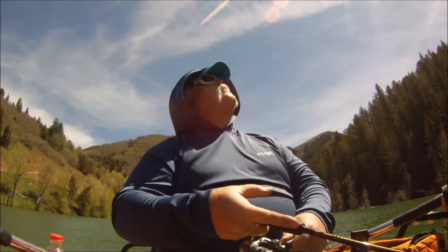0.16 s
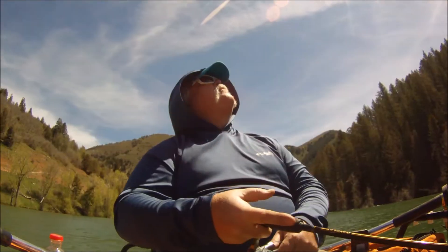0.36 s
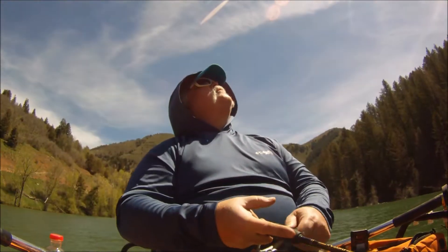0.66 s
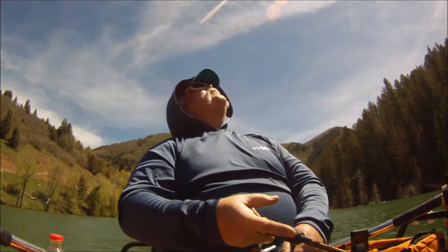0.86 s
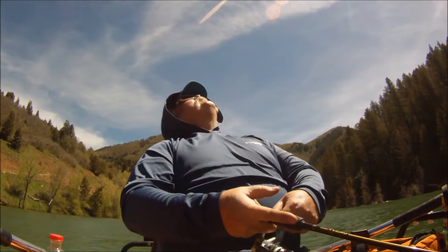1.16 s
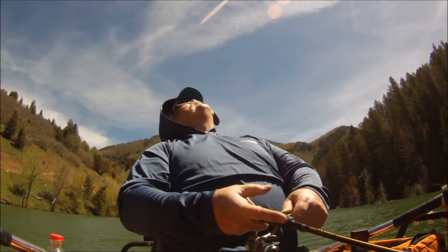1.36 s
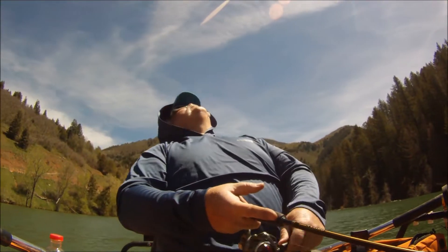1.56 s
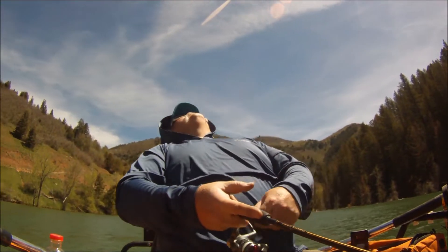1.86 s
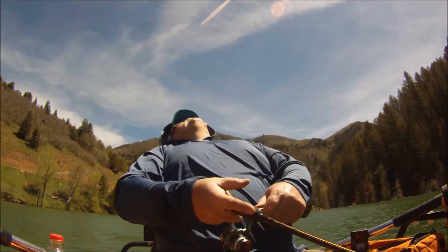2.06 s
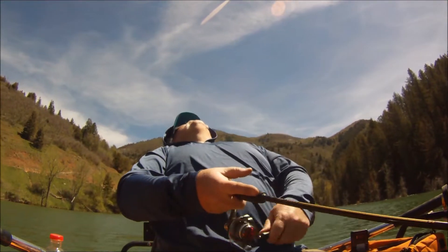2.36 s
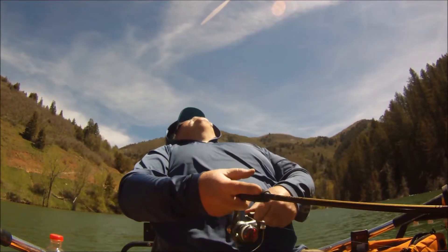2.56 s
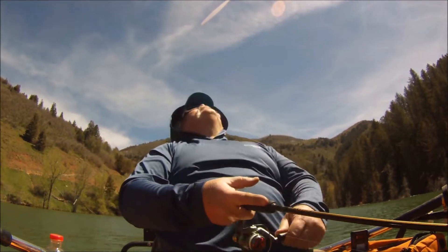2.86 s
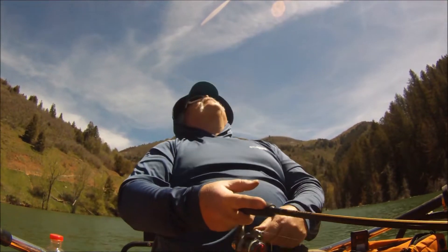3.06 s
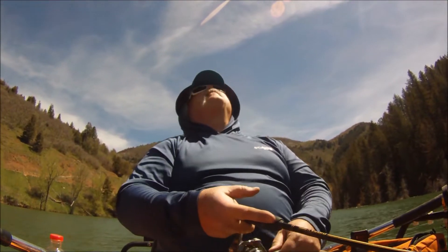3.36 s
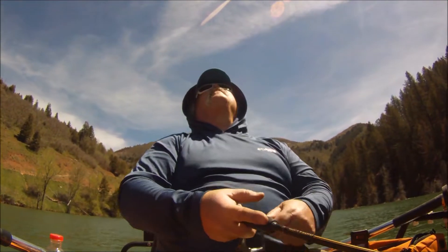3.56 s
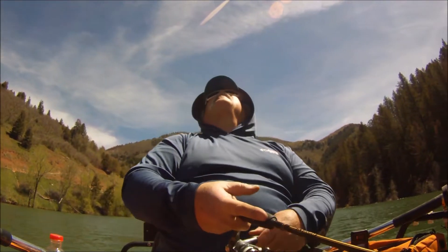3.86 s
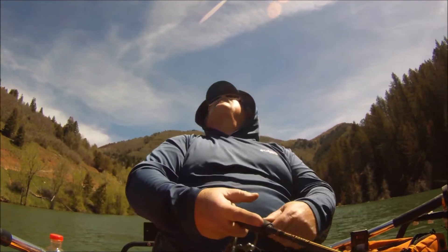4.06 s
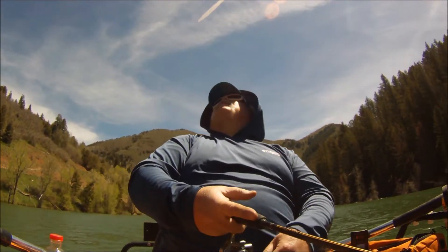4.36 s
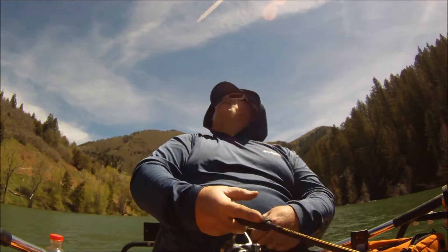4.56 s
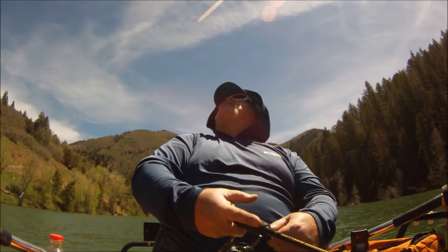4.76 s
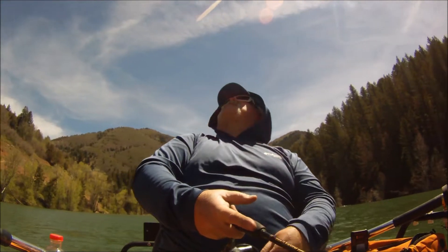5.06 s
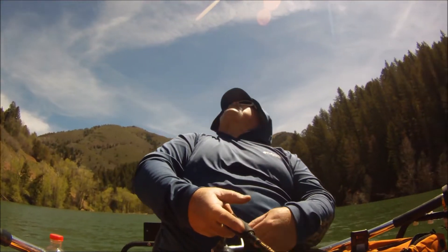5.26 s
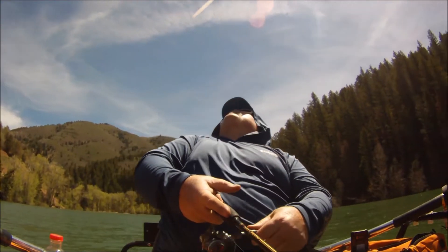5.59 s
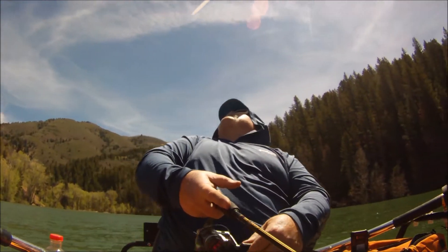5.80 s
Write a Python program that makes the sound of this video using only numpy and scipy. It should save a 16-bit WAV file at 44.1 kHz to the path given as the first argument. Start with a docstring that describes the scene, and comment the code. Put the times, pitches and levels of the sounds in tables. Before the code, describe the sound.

Outdoors on a lake, a distant jet's dull, wavering roar rises over the first second and stays, slightly hollow from its reflection off the water. Close to a small camera on a fishing boat, water drips and snaps, with busy bubbling splashes just after one second and again past four. A tiny metal tinkle and faint thin whistles come near the start. One channel, highs cut.

```python
"""A jet passes high over a mountain lake, heard by a small camera on a fishing boat.
Its roar is noise dulled by far air and shaken by turbulence; a late copy off the water combs it.
Water hisses, snaps and drips at the hull: noise bursts for splashes, short sines for bubbles.
Decaying sines make a bit of metal tackle tinkle, gliding sines whistle thinly, and soft airy noise swells twice."""
import sys
import numpy as np
from scipy import signal
from scipy.fft import rfft, irfft, next_fast_len
from scipy.io import wavfile
from scipy.ndimage import uniform_filter1d, map_coordinates

SR = 44100
rng = np.random.default_rng(int(sys.argv[2]) if len(sys.argv) > 2 else 0)


def wav_record(signal):
    """Record a signal, one row per channel, as 16-bit PCM in the file named by sys.argv[1]."""
    frames = np.transpose(np.atleast_2d(signal))
    bounded = np.clip(frames, -1, 1)
    # unit amplitude maps onto the largest positive 16-bit level
    quanta = np.round(bounded * 32767).astype(np.int16)
    wavfile.write(sys.argv[1], SR, quanta)


N = 261492
T = np.arange(N) / SR  # the time of every sample, in seconds


def undb(db):
    """Turns dB into a plain factor."""
    return 10 ** (np.asarray(db) / 20)


def unit(x):
    """Scales x to an rms of 1."""
    return x / np.sqrt(np.mean(x ** 2))


def curves(table):
    """Joins the points of each column by straight lines in time."""
    s, *columns = np.transpose(table)
    return [np.interp(T, s, c) for c in columns]


def noise():
    """White noise with a spread of 1."""
    return rng.standard_normal(N)


def walk(rate):
    """A random wavering with a spread of 1: levels held 1 / rate seconds, then smoothed twice."""
    hold = int(SR / rate)
    levels = np.repeat(rng.standard_normal(N // hold + 1), hold)
    smooth = uniform_filter1d(uniform_filter1d(levels, hold), hold)[:N]
    smooth = smooth - uniform_filter1d(smooth, 5 * hold)  # no long drift
    return smooth / smooth.std()


def spectrum_gain(spectrum):
    """Joins (Hz, dB) points over log frequency; gives FFT size, log frequencies and gains."""
    hz, db = np.transpose(spectrum)
    size = next_fast_len(N)
    logf = np.log(np.maximum(np.arange(size // 2 + 1), 1) * SR / size)
    return size, logf, undb(np.interp(logf, np.log(hz), db, left=-120, right=-120))


def coloured(x, spectrum):
    """Colours x by (Hz, dB) points, scaled so that unit noise stays near unit level."""
    size, _, gain = spectrum_gain(spectrum)
    return irfft(rfft(x, size) * unit(gain), size)[:N]


def bands(x, spectrum, count):
    """Colours x and splits it into overlapping log-spaced bands: (centre in Hz, signal) pairs."""
    size, logf, gain = spectrum_gain(spectrum)
    full = rfft(x, size) * gain
    centres = np.linspace(np.log(spectrum[0][0]), np.log(spectrum[-1][0]), count)
    step = centres[1] - centres[0]
    pairs = []
    for centre in centres:
        window = np.cos(np.clip((logf - centre) / step, -1, 1) * np.pi / 2) ** 2
        pairs.append((np.exp(centre), irfft(full * window, size)[:N]))
    return pairs


def wavering_noise(spectrum, count, waver_db, rate):
    """Coloured noise whose bands waver in level independently; rms 1."""
    return unit(sum(x * undb(waver_db * walk(rate)) for _, x in bands(noise(), spectrum, count)))


def ring(s, db, hz, t60, glide, rise_s):
    """One softly starting, decaying sine per start time; t60 is the time to fall 60 dB, glide in Hz per s."""
    out = np.zeros(N)
    for start, gain, f, decay, up in zip(*np.broadcast_arrays(s, undb(db), hz, t60, glide)):
        i = int(start * SR)
        t = np.arange(min(int(decay * SR) + 1, N - i)) / SR
        shape = np.exp(-np.log(1000) * t / decay) * (1 - np.exp(-t / rise_s))
        out[i:i + len(t)] += gain * np.sin(2 * np.pi * (f + up * t / 2) * t) * shape
    return out


def tails(s, db, tau_s):
    """An envelope that jumps at each time and dies away."""
    hits = np.zeros(N)
    hits[(s * SR).astype(int)] = undb(db)
    return signal.lfilter([1], [1, -np.exp(-1 / (tau_s * SR))], hits)


# Colour of the airy hiss. Each row: frequency in Hz, relative level in dB per Hz.
AIRY_COLOUR = [(3000, -20.5), (4200, -1.5), (5300, -0.5), (6200, -7), (7400, -6), (9500, -15.5),
               (13000, -23)]
# Its two swells. Each row: time in seconds, level in dB.
AIRY_LEVEL = [(2.42, -93.5), (2.55, -74), (2.72, -70), (2.97, -74), (3.04, -93.5), (5.18, -96), (5.23, -68),
              (5.3, -72), (5.38, -94)]


def airy():
    """A soft noise that swells and stops, as of wet line drawn through the rod."""
    return undb(curves(AIRY_LEVEL)[0]) * wavering_noise(AIRY_COLOUR, count=6, waver_db=1.5, rate=12)


# Faint gliding whistles. Each row: start in seconds, length in seconds, level in dB before wavering,
# start pitch in Hz, end pitch in Hz.
WHISTLE_GLIDES = [(0.369, .07, -72, 3250, 3500), (.373, .045, -59, 2210, 2250),
                  (.44, .082, -64, 1760, 2000), (0.444, 0.15, -68, 3000, 3620), (.63, .08, -81, 3100, 3670)]
WHISTLE_EDGE_S, WHISTLE_BEND = .01, 1.3  # fade in and out; a bend above 1 makes the start of the glide faster


def whistles():
    """Thin sines whose pitch rises fastest at first, then levels off; their loudness wavers quickly."""
    out = 0
    for s, length, db, start_hz, end_hz in WHISTLE_GLIDES:
        part = np.clip((T - s) / length, 0, 1)
        hz = end_hz - (end_hz - start_hz) * (1 - part) ** WHISTLE_BEND
        shape = np.clip(np.minimum(T - s, s + length - T) / WHISTLE_EDGE_S, 0, 1)
        out = out + undb(db) * shape * np.sin(2 * np.pi * np.cumsum(hz) / SR)
    return out * undb(2.7 * walk(59.3))


# Touches of the bouncing metal. Each row: start in seconds, strength in dB.
TACKLE_TOUCHES = [(0.2222, -42), (0.2351, -39), (0.2443, -36), (0.2569, -31)]
# Ringing tones of the metal. Each row: pitch in Hz, relative level in dB, time to fall 60 dB in seconds.
TACKLE_MODES = [(6692, -6.5, 0.13), (9652, -7.5, 0.27), (15260, -36, .1)]


def tackle():
    """A small metal piece bounces: a noise tick at each touch, its ringing modes from the second on."""
    s, db = np.transpose(TACKLE_TOUCHES)
    modes = sum(ring(s[1:], db[1:] + mode_db, hz, t60, 0, rise_s=0.00025) for hz, mode_db, t60 in TACKLE_MODES)
    tick_colour = [(2500, -20.5), (4000, -3.0), (6000, 0.5), (9000, -2.5), (15500, -12.0)]  # (Hz, dB)
    return modes + coloured(tails(s, db, 0.001) * noise(), tick_colour)


# Colour of the smooth water hiss. Each row: frequency in Hz, relative level in dB per Hz.
HISS_COLOUR = [(1650, -32.5), (2800, -4.5), (3640, -20), (5310, -8.5), (6430, -13), (8010, -10),
               (14500, -14), (15300, -20.5)]
# Loudness of that hiss. Each row: time in seconds, level in dB.
HISS_LEVEL = [(0, -76), (.12, -66), (.25, -64.5), (.6, -67), (1.3, -72.5), (2.4, -75.5), (2.98, -75.5),
              (3.05, -79.5), (3.5, -79.5), (3.75, -76.5), (4.2, -73.5), (4.95, -73.5), (5.06, -81),
              (5.18, -74.5), (5.3, -74), (5.93, -73)]
# Colour of fizz, snaps and splashes. Each row: frequency in Hz, relative level in dB per Hz.
CRACKLE_COLOUR = [(1100, -32.5), (1500, 1.5), (2200, -2.5), (2890, -6), (3480, -4.5), (4840, -7.5),
                  (5890, -9), (8250, -17.5), (12000, -37.5), (15600, -59)]
# Loudness of the fizzing grains. Each row: time in seconds, level in dB before the grains are mixed.
FIZZ_LEVEL = [(0, -57.5), (.57, -65.5), (.88, -62.5), (1.0, -66), (1.24, -63.5), (1.3, -50.5), (1.39, -69),
              (1.45, -70.5), (2.0, -74), (2.3, -72), (2.42, -73), (3.0, -73), (3.11, -79), (3.6, -74.5),
              (3.78, -66.5), (4.0, -68.5), (4.26, -67), (4.34, -53.5), (4.39, -58), (4.43, -59.5),
              (4.46, -59), (4.5, -54), (4.55, -60), (4.65, -67), (5.0, -69.5), (5.2, -72), (5.27, -67.5),
              (5.6, -72), (5.9, -63)]
# Thin broad snaps at the hull. Each row: start in seconds, strength in dB before smoothing.
HULL_SNAPS = [(.008, -42.5), (.148, -59), (.171, -45), (.343, -61.5), (0.36, -53), (.53, -54.5),
              (0.542, -52), (0.5602, -51.5), (.712, -51), (0.7772, -51), (0.834, -56), (0.86, -43),
              (.942, -59), (.993, -54.5), (1.036, -52), (1.049, -50.5), (1.191, -43.5), (1.266, -42.5),
              (1.333, -40), (1.362, -42), (1.214, -48), (1.4273, -52), (2.299, -54.5), (2.362, -64),
              (3.7, -56.5), (3.766, -51.5), (3.884, -59.5), (3.925, -50.5), (3.967, -48.5), (4.0348, -63),
              (4.0748, -52.5), (4.107, -43.5), (4.114, -43.5), (4.233, -49.5), (4.341, -44), (4.422, -49),
              (4.472, -42.5), (4.587, -54), (4.6768, -64), (5.001, -64), (5.228, -61), (5.398, -59),
              (5.424, -57), (5.635, -49.5), (5.7509, -56), (5.763, -54.5), (5.8544, -56), (5.8827, -42),
              (5.903, -51.5)]
SNAP_S = 0.0013  # decay time of a snap


def snap_noise(s, db):
    """Short bursts of crackling noise with slightly rounded edges."""
    return coloured(uniform_filter1d(tails(s, db, SNAP_S), size=50) * noise(), CRACKLE_COLOUR)


def water():
    """Smooth hiss, and a fizz of tiny bubbles of scattered size and pitch with thin snaps among them."""
    hiss = wavering_noise(HISS_COLOUR, count=6, waver_db=1.2, rate=5.0)
    fizz = wavering_noise(CRACKLE_COLOUR, count=9, waver_db=2.6, rate=40)
    when, pitch, size = rng.random((1400, 3)).T
    hz = 2100 * 3.6 ** pitch
    size_db = np.minimum(-4.1 * np.log(size), 13)  # many weak bubbles, few strong ones
    pop_db = size_db - 2.2 * np.log2(hz / 3000)  # higher ones are weaker
    pops = ring(when * N / SR, pop_db, hz, 25 / hz, 0, rise_s=0.0012)
    when, size = rng.random((350, 2)).T
    small_snaps = snap_noise(when * N / SR, np.minimum(-4.5 * np.log(size), 9))
    grains = undb(-0.5) * fizz + undb(-4.5) * unit(pops) + undb(-6.5) * unit(small_snaps)
    loud_snaps = snap_noise(*np.transpose(HULL_SNAPS))
    return undb(curves(HISS_LEVEL)[0]) * hiss + undb(curves(FIZZ_LEVEL)[0]) * grains + loud_snaps


# Bursting bubbles. Each row: start in seconds, strength in dB before the soft onset, starting pitch in Hz.
DRIP_BUBBLES = [(0.019, -34, 4310), (0.0548, -42, 2580), (0.199, -32.5, 3160), (.36, -34, 5340),
                (0.5612, -36.5, 3700), (.714, -40.5, 4850), (0.778, -30.5, 4480), (.797, -39, 6500),
                (0.856, -38, 4700), (0.8646, -46.5, 2230), (.876, -39, 5500), (.902, -50, 3900),
                (.92, -39.5, 4600), (.99, -48, 4970), (1.102, -39, 3800), (1.1022, -29, 6160),
                (1.116, -40.5, 2200), (1.116, -42, 4700), (1.139, -44, 5900), (1.151, -34.5, 3530),
                (1.255, -41, 5000), (1.285, -38, 6030), (1.314, -40, 2700), (1.385, -45, 5200),
                (1.391, -43, 3900), (1.444, -46, 4900), (.236, -25, 3800), (.237, -35, 2400),
                (1.1838, -31, 4400), (1.2143, -32.5, 3960), (1.225, -35.5, 2930), (1.232, -32.5, 5800),
                (1.24, -43.5, 4200), (1.262, -25, 6900), (1.264, -37, 3450), (1.265, -25, 5470),
                (1.27, -36, 2200), (1.2937, -33, 2360), (1.2963, -27, 5340), (1.3, -29.5, 3920),
                (1.306, -30.5, 6550), (1.324, -22.5, 3930), (1.332, -21.5, 3380), (1.3338, -32, 2170),
                (1.358, -23, 3730), (1.3605, -27.5, 7250), (1.3606, -16, 5760), (1.429, -37, 3790),
                (1.7522, -45.5, 5860), (3.5, -49.5, 4500), (3.549, -48, 3120), (3.656, -41, 3460),
                (3.7242, -47.5, 2560), (3.766, -44, 2480), (3.8171, -35.5, 3850), (3.842, -38, 3900),
                (3.856, -40, 4310), (3.87, -44, 3100), (3.891, -47, 5400), (3.911, -37.5, 3450),
                (3.9121, -30, 4940), (4.108, -31.5, 5220), (4.111, -36, 2170), (4.153, -38, 2930),
                (4.159, -31.5, 5800), (4.167, -40.5, 4150), (4.233, -34, 4060), (4.2527, -53, 2830),
                (4.2312, -42.5, 2140), (4.2878, -41, 3300), (4.302, -34.5, 6070), (4.3213, -25.5, 4180),
                (4.335, -28, 4300), (4.3398, -28, 2420), (4.361, -36.5, 2580), (4.362, -30.5, 3480),
                (4.3675, -26.5, 3250), (4.4209, -30.5, 2230), (4.4751, -25, 3200), (4.484, -34, 4300),
                (4.4901, -29.5, 6300), (4.4893, -29.5, 2580), (4.508, -43.5, 4500), (4.5225, -34.5, 2490),
                (4.543, -35, 4650), (4.566, -32, 7650), (4.5636, -25.5, 6100), (4.565, -30, 2580),
                (4.615, -23, 3500), (4.62, -38, 2780), (4.628, -36.5, 2850), (4.254, -42, 4700),
                (4.289, -37, 4900), (4.313, -41, 4500), (4.335, -35, 5200), (4.345, -46, 5600),
                (4.385, -46, 5000), (4.397, -45, 6000), (4.423, -38.5, 5100), (4.44, -38, 2500),
                (4.465, -35.5, 6000), (4.649, -49, 5070), (4.688, -47, 4960), (4.678, -39, 3450),
                (4.72, -40, 5500), (4.8394, -38, 3930), (5.127, -50, 8000), (5.248, -44.5, 4400),
                (5.317, -37.5, 3880), (5.386, -37, 6240), (5.434, -43, 4200), (5.498, -46.5, 4060),
                (5.573, -40, 6340), (5.608, -42, 6240), (5.658, -38.5, 3480), (5.6806, -48, 2720),
                (5.7516, -38, 2330), (5.825, -34.5, 5140), (5.884, -37.5, 3320)]
# Larger bubbles. Each row: start in seconds, strength in dB before the soft onset, starting pitch in Hz,
# time to fall 60 dB in seconds, rise in pitch in Hz per second.
LARGE_BUBBLES = [(.15, -44, 1870, 0.042, 500), (0.142, -31, 1080, 0.06, 500), (.2, -33, 1195, 0.039, 500),
                 (.71, -55, 1560, .04, 500), (0.779, -46, 1510, 0.053, 500), (.9, -54, 2200, .05, 500),
                 (0.941, -38, 1500, .04, 497), (.993, -40, 1410, 0.032, 500), (1.036, -41, 1330, .05, 504),
                 (.86, -44, 1980, .04, 496), (1.04, -44, 1920, .05, 500), (1.191, -35, 1640, 0.031, 500),
                 (4.114, -29, 1790, 0.03, 9000), (4.233, -32, 1780, 0.025, 500),
                 (4.34, -32, 1800, 0.036, 500), (4.425, -35, 1820, 0.033, 500),
                 (4.586, -51, 3020, 0.074, 500)]
DRIP_CYCLES = 27  # cycles in which a drip falls 60 dB
DRIP_RISE_PER_S = 13  # rise in pitch, as a share of the pitch per second
SPLASH_DB, SPLASH_TAIL_DB = -30, -31.5  # against the drip, before smoothing
SPLASH_S, SPLASH_TAIL_S = .0018, .012  # decay times
# A quieter second ring follows each drip, up to this late and up to this much higher or lower in pitch.
SECOND_DB, SECOND_LAG_S, SECOND_OCTAVES = -9, 0.0067, 0.45


def drips():
    """Each bubble rings briefly inside a soft splash that trails off; larger bubbles ring lower and longer."""
    s, db, hz = np.transpose(DRIP_BUBBLES)
    burst = tails(s, db + SPLASH_DB, SPLASH_S) + tails(s, db + SPLASH_TAIL_DB, SPLASH_TAIL_S)
    splash = coloured(uniform_filter1d(burst, size=90) * noise(), CRACKLE_COLOUR)
    lag, off = rng.random((len(s), 2)).T
    second_hz = hz * 2 ** (SECOND_OCTAVES * (2 * off - 1))
    second_s = s + SECOND_LAG_S * lag
    second = ring(second_s, db + SECOND_DB, second_hz, DRIP_CYCLES / second_hz, 0, rise_s=0.00043)
    main = ring(s, db, hz, DRIP_CYCLES / hz, DRIP_RISE_PER_S * hz, rise_s=0.0013)
    large = ring(*np.transpose(LARGE_BUBBLES), rise_s=0.00084)
    return main + splash + second + large


# Colour of the rumble. Each row: frequency in Hz, relative level in dB per Hz.
RUMBLE_COLOUR = [(8.8, -59), (15, -32.5), (35, -20), (60, -8.5), (113, -0.5), (167, -2.5), (260, -2.5),
                 (340, -22.5), (570, -120)]
# Its loudness. Each row: time in seconds, level in dB.
RUMBLE_LEVEL = [(0, -34.5), (.9, -37.5), (1.6, -38.5), (2.2, -38.5), (2.9, -38.5), (3.4, -39), (4, -39.5),
                (4.7, -41.5), (5.93, -45)]


def rumble():
    """The deepest part of the roar, rolling about the valley: low noise, its bands wavering slightly."""
    return undb(curves(RUMBLE_LEVEL)[0]) * wavering_noise(RUMBLE_COLOUR, count=5, waver_db=0.3, rate=4)


# Short decaying low tones within the roar. Each row: start in seconds, strength in dB before the soft onset.
LOW_TONES = [(0.704, -3), (.862, -8.5), (0.923, -23), (1.168, -4.5), (1.267, -12), (1.511, -4.5),
             (1.725, -1), (1.988, -16), (2.083, -8), (2.357, 2.5), (2.721, -4.5), (3.417, -25),
             (3.545, -31), (4.005, -0.5), (4.201, 0.5), (4.539, -1), (5.61, 1), (5.861, -30)]
LOW_TONE_T60_S = 0.042  # time to fall 60 dB


def low_tones():
    """Short decaying sines within the roar, pitched at the centre of its strongest band."""
    s, db = np.transpose(LOW_TONES)
    centre_hz = np.interp(s, T, curves(JET_PASS)[2])
    return ring(s, db, centre_hz, LOW_TONE_T60_S, 0, rise_s=0.0077)


# The passing roar. Each row: time in seconds, level in dB before its parts are lifted,
# level of the lower part against that in dB before its swells, centre of the strongest band in Hz, its lift in dB.
JET_PASS = [(0, -49, 14.5, 785, 9), (.2, -38, 5.5, 750, 10.5), (.55, -31.5, 5.5, 757, 7),
            (.67, -26.5, 4, 690, 9), (.78, -30.5, 2, 680, 10), (.97, -23.5, -2, 690, 3.5),
            (1.1, -21.5, -4, 650, 2.5), (1.3, -22.5, -2, 676, 4), (1.55, -24, -4.5, 645, 7),
            (1.75, -21, -1.5, 615, 3), (2.0, -25, -3.5, 600, 8), (2.3, -22, -0.5, 587, 4),
            (2.55, -22, -1.5, 574, 4), (2.7, -24.5, 0.5, 570, 4), (2.9, -24, -2.5, 640, 4),
            (3.05, -25, -0.5, 653, 7), (3.2, -25.5, 5.5, 700, 2.5), (3.37, -26, 1, 735, 10),
            (3.75, -29, 3, 740, 13.5), (4.1, -25.5, -7.5, 760, 6), (4.35, -26.5, 0.5, 750, 10),
            (4.58, -24, -3, 740, 9), (4.72, -24.5, 3.5, 650, 5.5), (4.95, -21.5, 2.5, 635, 5),
            (5.2, -22.5, 2.5, 621, 1), (5.33, -26.5, 6, 666, 3), (5.45, -25, -2.5, 630, 3),
            (5.63, -25, 2, 620, 9), (5.75, -30, 9, 657, 7), (5.93, -24.5, 1, 660, 5.5)]
# Basic colour of the roar. Each row: frequency in Hz, relative level in dB per Hz.
ROAR_COLOUR = [(71, -41.5), (120, -20.5), (223, -17), (298, -8), (327, -5), (393, -2), (454, 0.5), (532, 2),
               (740, -1.5), (830, -5), (930, -8.5), (1110, -11.5), (1300, -15.5), (1430, -20),
               (1690, -30.5), (1810, -31.5), (2270, -50), (2800, -65.5), (3640, -84)]
# Brief swells of the lower part. Each row: middle in seconds, lift in dB.
LOWER_SWELLS = [(.67, 5), (.95, 2.5), (1.3, 5.5), (1.77, 8), (2.499, -0.5), (2.72, 5), (2.93, 10),
                (3.03, 8.5), (3.17, 1.5), (3.3, 0.5), (3.6, 5), (3.83, 8), (3.969, 9), (4.172, 16.5),
                (4.38, 11.5), (5.05, 5), (5.29, 8.5), (5.62, 10), (5.9, 5.5)]
# An upper band comes and goes, mostly sinking as the jet passes. Each row: time in seconds, centre in Hz, lift in dB.
SINKING_BAND = [(.15, 1050, 5), (.6, 1050, 9), (1.1, 1050, -3), (1.6, 950, -7.5), (2.5, 900, -3),
                (2.75, 900, 2.5), (2.9, 953, 7), (3.05, 970, 8.5), (3.2, 920, 13), (3.32, 888, 10),
                (3.45, 875, 5.5), (3.6, 870, 2), (3.9, 870, 6), (4.6, 870, 3), (5.2, 810, 3.5),
                (5.93, 800, 2)]
# A higher band, climbing for most of the time. Each row: time in seconds, centre in Hz, lift in dB.
CLIMBING_BAND = [(1, 1095, 2), (2, 1170, 5.5), (2.8, 1227, 4), (3.5, 1276, 5), (3.9, 1406, 4.5),
                 (4.3, 1515, 9.5), (5, 1446, -1.5), (5.93, 1430, 3.5)]
# The copy off the water. Each row: time in seconds, comb spacing in Hz before ripples shift it, share reflected (0-1).
WATER_REFLECTION = [(0, 313, 0.62), (1.2, 275.4, 0.19), (1.8, 286.5, 0), (2.7, 312, 0.23), (3.1, 323, 0),
                    (3.35, 370, 0.37), (3.7, 363, 0.19), (4.1, 360, 0.74), (4.58, 360, 0.62),
                    (4.7, 377, 0.21), (5.3, 377, 0.25), (5.93, 345, 0.35)]
LOWER_HZ, LOWER_EDGE_HZ = 380, 520  # the lower part fades in below the edge
MIDDLE_HZ, UPPER_HZ = 750, 1300  # the upper part fades in above the middle
LOW_SWELL_S = 0.031
# Upper part against the roar, at UPPER_HZ: at the start, far off, overhead.
TREBLE_START_DB, TREBLE_FAR_DB, TREBLE_NEAR_DB = 16.5, -12.5, 3
TREBLE_SETTLE_S, NEARING_S, OVERHEAD_S = 0.14, 0.86, 3.32
# A lower band climbs and flattens.
LOW_EARLY_HZ, LOW_LATE_HZ, LOW_EARLY_DB, LOW_LATE_DB = 219, 445, 13.5, 0.5
LOW_CLIMB_S = (2, 2.3)
SCATTER_HZ = 1230  # ripples scatter the reflection above this


def hump(hz, centre_hz, octaves):
    """A smooth bump over pitch: 1 at its centre, falling away on both sides."""
    return np.exp(-(np.log2(hz / centre_hz) / octaves) ** 2)


def reflected(roar, spacing_hz):
    """The lake returns the roar late and dulled; ripples shift the mirror point and so the delay."""
    lag = SR / spacing_hz * (1 + 0.029 * walk(7.4))  # in samples
    echo = map_coordinates(roar, [np.arange(N) - lag], order=3)
    return signal.filtfilt(*signal.butter(2, SCATTER_HZ, fs=SR), echo)


def jet(flutter_db=1.5, patchy_db=1.21, branch_octaves=0.11, lift_octaves=0.23, low_octaves=0.32):
    """Exhaust noise whose treble opens as the air path shortens; turbulence shakes it; the lake returns it late."""
    db, lower_db, centre_hz, lift_db = curves(JET_PASS)
    ridges = [curves(SINKING_BAND), curves(CLIMBING_BAND)]
    spacing_hz, share = curves(WATER_REFLECTION)
    lower_db = lower_db + sum(swell_db * np.exp(-((T - s) / LOW_SWELL_S) ** 2) for s, swell_db in LOWER_SWELLS)
    upper_db = np.interp(T, [NEARING_S, OVERHEAD_S], [TREBLE_FAR_DB, TREBLE_NEAR_DB])
    upper_db = upper_db + (TREBLE_START_DB - TREBLE_FAR_DB) * np.exp(-T / TREBLE_SETTLE_S)
    low_hz = np.interp(T, LOW_CLIMB_S, [LOW_EARLY_HZ, LOW_LATE_HZ])
    low_lift_db = np.interp(T, LOW_CLIMB_S, [LOW_EARLY_DB, LOW_LATE_DB])
    parts = bands(noise(), ROAR_COLOUR, count=34)
    scale = np.sqrt(np.mean(sum(x for _, x in parts) ** 2))
    flutter, roar = walk(25.13), 0  # all bands flutter together
    for hz, x in parts:
        below = np.clip(np.log(LOWER_EDGE_HZ / hz) / np.log(LOWER_EDGE_HZ / LOWER_HZ), 0, 1)
        # air takes more the higher the pitch
        above = np.clip(np.log(hz / MIDDLE_HZ) / np.log(UPPER_HZ / MIDDLE_HZ), 0, 1.4)
        lift = lift_db * hump(hz, centre_hz, lift_octaves) + low_lift_db * hump(hz, low_hz, low_octaves)
        lift = lift + sum(ridge_db * hump(hz, ridge_hz, branch_octaves) for ridge_hz, ridge_db in ridges)
        shaking = flutter_db * flutter + patchy_db * walk(9)  # each band also wavers alone
        roar = roar + x * undb(below * lower_db + above * upper_db + lift + shaking)
    share = np.clip(share, 0, 1)
    combed = (roar + share * reflected(roar, spacing_hz)) / np.sqrt(1 + share ** 2)
    return undb(db) * combed / scale


def scene():
    """All layers sound together in one channel."""
    return (jet() + low_tones() + rumble() + water() + drips() + whistles() + tackle() + airy())[None]


TOP_HZ = 15400


def record(dry):
    """The camera cuts the top: a steep filter removes what lies above TOP_HZ."""
    return signal.sosfilt(signal.ellip(10, .2, 80, TOP_HZ, fs=SR, output="sos"), dry)


dry = scene()
out = record(dry)
wav_record(out)
```